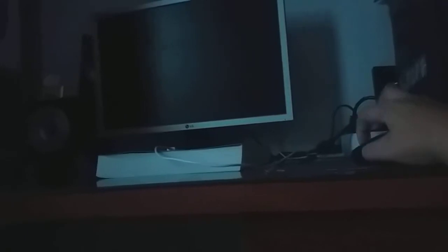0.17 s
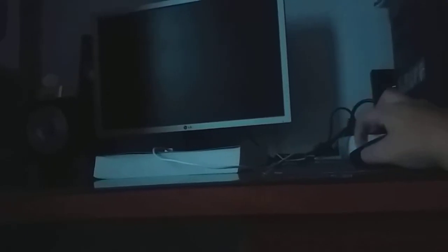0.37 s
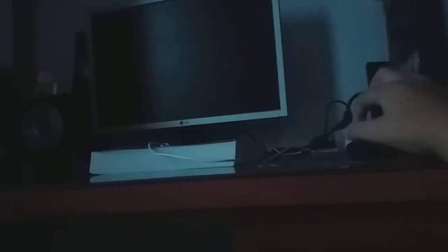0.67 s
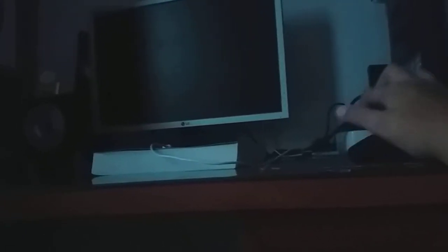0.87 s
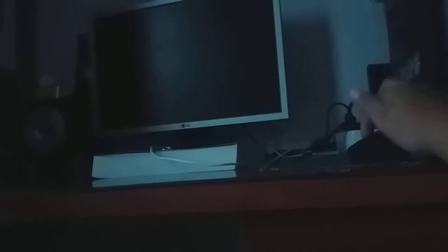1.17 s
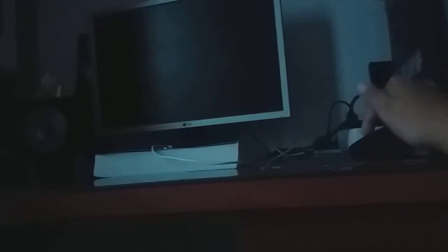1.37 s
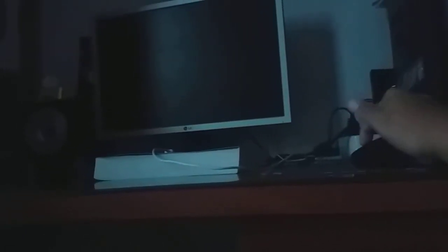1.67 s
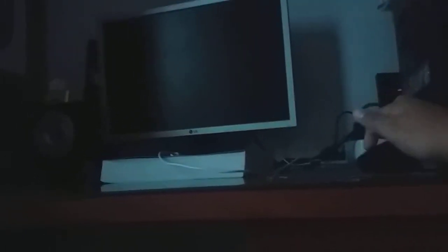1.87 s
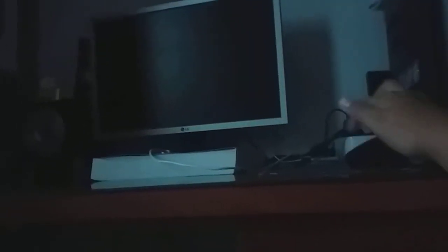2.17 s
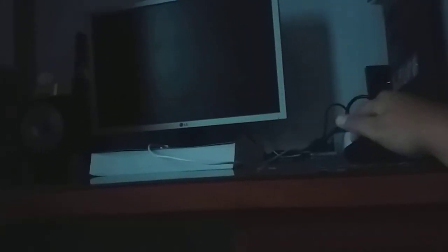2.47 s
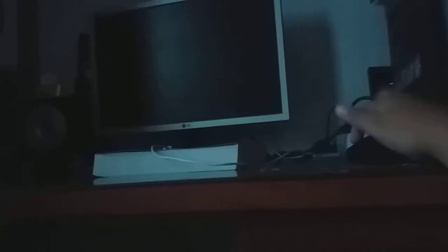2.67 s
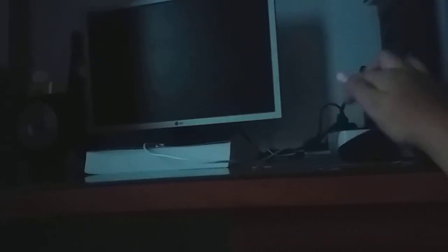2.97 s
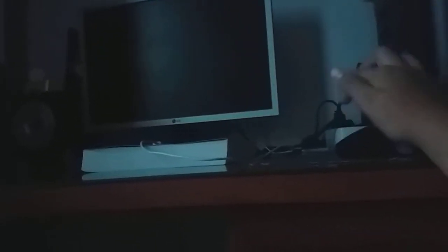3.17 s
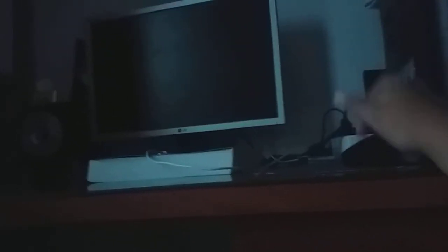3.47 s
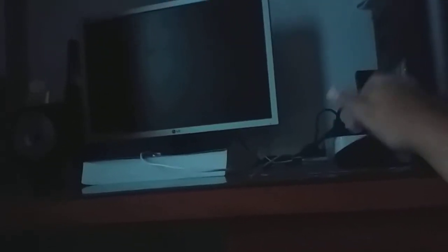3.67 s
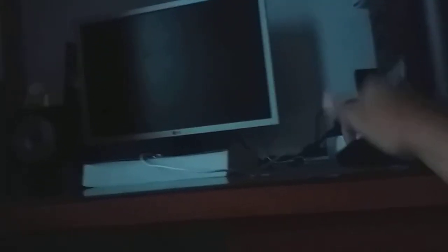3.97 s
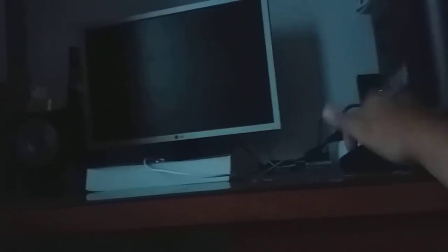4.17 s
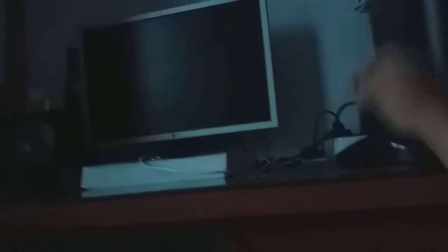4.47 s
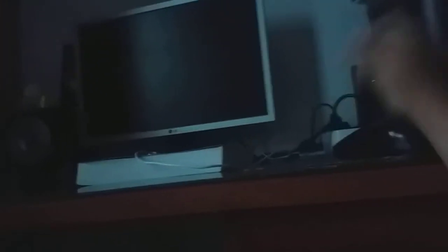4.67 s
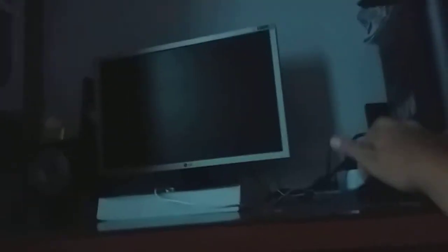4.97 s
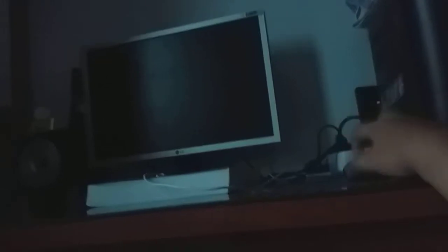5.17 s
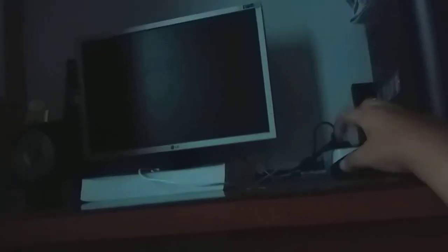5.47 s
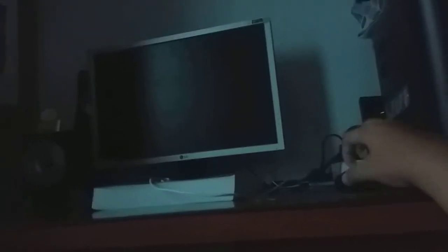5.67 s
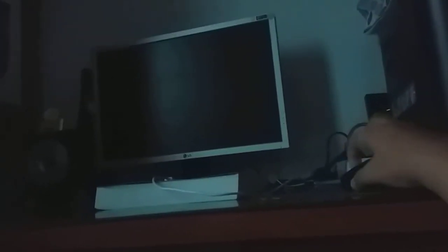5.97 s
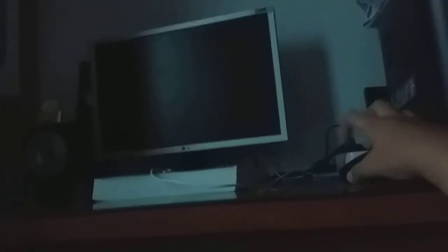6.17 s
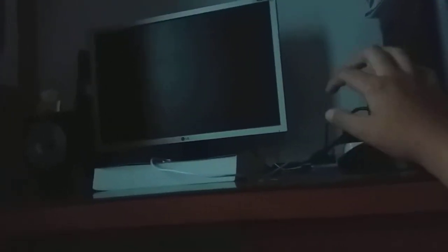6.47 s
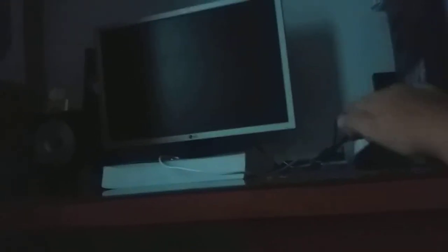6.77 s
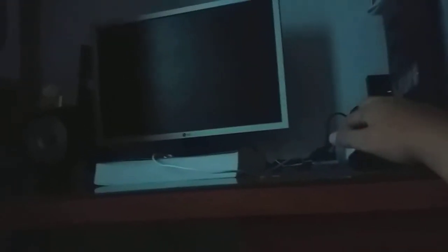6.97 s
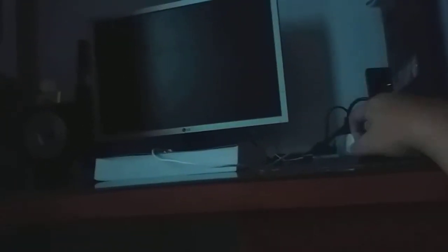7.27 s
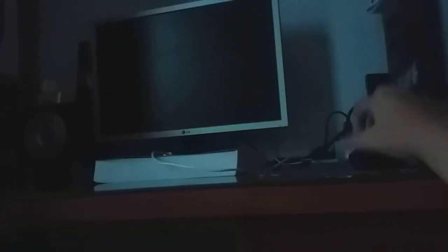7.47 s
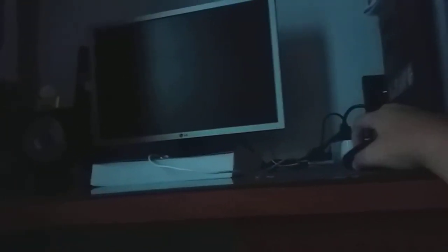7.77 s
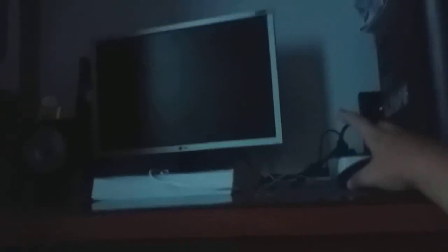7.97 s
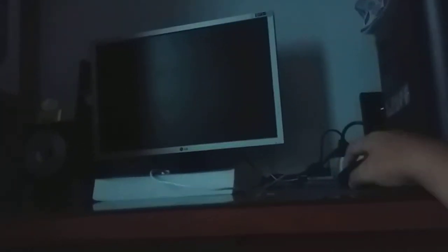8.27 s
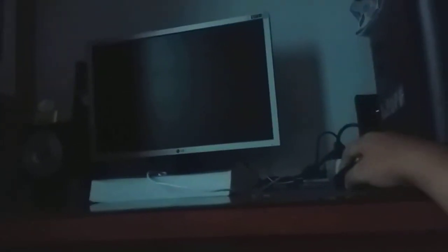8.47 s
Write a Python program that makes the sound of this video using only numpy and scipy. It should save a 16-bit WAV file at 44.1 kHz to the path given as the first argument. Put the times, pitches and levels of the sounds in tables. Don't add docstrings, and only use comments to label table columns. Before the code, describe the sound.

A very faint far whistle vanishes at once as a fingertip starts clicking a mouse button evenly, press and tiny release. Then fingers drop on the shell from above: brighter, louder, hollow plastic clacks, at first regular, later spaced unevenly with scrapy little nudges between. Muffled knocks travel through the desk. Quiet small room with faint hum swelling midway and steady hiss, picked up by a phone nearby.

```python
import sys
import numpy as np
from scipy import signal
from scipy.fft import rfft, irfft
from scipy.io import wavfile

SR = 44100
rng = np.random.default_rng(int(sys.argv[2]) if len(sys.argv) > 2 else 0)


def rack_gain(trim_db):
    fader = np.asarray(trim_db, float)
    return 10 ** (fader / 20)


def put_to_file(sound):
    columns = np.atleast_2d(sound).T
    safe = np.clip(columns, -1, 1)
    whole_steps = np.round(safe * 32767)
    wavfile.write(sys.argv[1], SR, whole_steps.astype(np.int16))


N = 380141
HIT = 16384
LEAD = 0.004

# start in seconds, shell peak in dB, switch spring in dB,
# desk in dB beside the shell, time held in seconds.
PRESSES = [(0.027, -37.5, -38, -23, .0522), (0.22, -14.5, -57, -28, 0.095),
           (0.4278, -34.5, -33.5, -21, 0.078), (0.604, -25.5, -30, -23.5, 0.071),
           (0.761, -36, -32, -27, .0701), (0.9523, -19.5, -27, -29, 0.095),
           (1.1543, -21.5, -26.5, -27, 0.076), (1.332, -26.5, -26, -19.5, 0.084),
           (1.5045, -39.5, -32, -48, 0.073), (1.68, -36, -28.5, -23.5, 0.089),
           (1.8838, -33, -25.5, -15.5, .0695), (2.0848, -21.5, -31, -24, 0.07),
           (2.2889, -24.5, -33, -28, 0.088), (2.4961, -21, -33, -23.5, .0802),
           (2.706, -28.5, -29, -15.5, 0.038), (5.4045, -36.5, -32.5, -24, 0.066)]
# start in seconds, shell peak in dB,
# then hollow belly and desk in dB beside the shell.
RAPS = [(2.8909, -14.5, -10, -30), (3.0772, -14.5, -10.5, -31), (3.268, -14, -10.5, -32.5),
        (3.4516, -12, -9, -33.5), (3.6305, -14, -6, -30.5), (3.8065, -19, -14, -31),
        (4.0228, -14.5, -8, -30), (4.208, -13, -7, -29.5), (4.4532, -5, -12, -28.5), (4.6338, -7, -9, -27),
        (4.846, -7.5, -11, -19), (5.6064, -12, -8.5, -18.5), (6.0244, -10.5, -8.5, -26),
        (6.2471, -12, -9.5, -25), (6.7336, -9.5, -9.5, -18.5), (7.2974, -5.5, -7.5, -22.5),
        (7.6764, -28, -15, -24), (8.175, -8.5, -7.5, -24), (8.4983, -12, -8, -24)]
# start in seconds, shell peak in dB,
# then belly, snap and desk in dB beside the shell.
NUDGES = [(5.219, -29, -7, -10, -23.5), (5.8164, -20, -10, -3.5, -22.5), (6.4099, -26, -4.5, -20, -8),
          (6.4219, -50.5, 7, -3, -5), (6.988, -38.5, -44, -5, -37.5), (7.01, -23.5, -27.5, -16.5, -38),
          (7.5308, -25, -7.5, -12.5, -16.5), (7.7036, -30, -14.5, -4.5, -23.5), (5.205, -49, -30, -22, -30),
          (7.8565, -51, -14.5, -22.5, -26), (8.007, -49, -11, -22, -12.5)]


def contacts():
    s, db, spring_db, desk_db, _ = np.transpose(PRESSES)
    snap_db = -12.5 - 0.24 * db
    press = s, db, -13, snap_db, spring_db - db, desk_db
    s, db, belly_db, desk_db = np.transpose(RAPS)
    rap = s, db, belly_db, -7, -28.5 - db, desk_db
    s, db, belly_db, snap_db, desk_db = np.transpose(NUDGES)
    nudge = s, db, belly_db, snap_db, -37, desk_db
    return in_time(press, rap, nudge)


# pitch in Hz, level in dB, t60 in seconds.
SHELL = [(2034, -1.5, 0.03), (2350, 10.5, 0.0038), (2620, 7, 0.0029), (3275, -3.5, 0.0048),
         (3600, 2.5, 0.0061)]
BELLY = [(660, 10, 0.0092), (720, -36, 0.013), (795, 9, 0.038), (939, -15, 0.0087), (990, 12, 0.0076)]
FLANK = [(1345, -6.5, 0.043), (1592, 8, 0.014), (1700, -0.5, 0.0087)]
SPRING = [(7820, -1, 0.018), (8130, -8.5, 0.03), (8300, -10, 0.031)]
DESK = [(95.5, -4, 0.03), (121, -6, 0.095), (150, -5.5, 0.084), (185, -5.5, 0.15), (230.6, -7.5, 0.045),
        (308, 1.5, 0.051), (420, -0.5, 0.036), (497, -7.5, 0.11), (563, -11, 0.019)]
# frequency in Hz, level in dB.
SNAP = [(3500, -25.5), (4400, -7), (5000, -2), (5600, 0), (7000, 1), (8000, -3), (8600, -5), (10400, -4.5),
        (12500, -5), (16000, -6.5)]


def hand_on_mouse():
    s, db, belly_db, snap_db, spring_db, desk_db = contacts()
    count = len(s)
    mouse = body(SHELL, count)
    mouse = mouse + rack_gain(2 * (belly_db + 9)) * body(BELLY, count)
    mouse = mouse + rack_gain(2 * (0.8 * belly_db + 3)) * body(FLANK, count)
    mouse = mouse + rack_gain(2 * (snap_db + 9.5 + shape(SNAP, HIT)))
    mouse = mouse + rack_gain(2 * (spring_db - 1)) * body(SPRING, count, detune=0.0024)
    tap = -strike(mouse, chatter(count, 0.0031, 330, 2500, uneven_db=2.5))
    push = chatter(count, 0.0193, 45, 48.2) * soft(52, 2100)
    thump = strike(body(DESK, count), push)
    return place(s[:, 0] - 0.0003, rack_gain(db + 14) * (tap + rack_gain(desk_db + 18) * thump))


# start in seconds, shell peak in dB,
# then belly and upper spring in dB beside the shell.
SETTLES = [
    (5.0093, -33.5, -28, -31),
    (5.034, -34.5, -6, -32),
    (5.7183, -36, -18, -23),
    (5.91, -39.5, -33, -12),
    (6.6705, -53.5, -16, -1.5),
    (7.189, -57, -18, -16),
    (7.4654, -37.5, -20, -11),
    (8.3285, -38, -13, -16.5),
    (8.359, -45, -10, -19),
]
# pitch in Hz, level in dB, t60 in seconds.
LET_GO = [(1550, -11.5, 0.004), (2250, 3.5, 0.0031), (3730, -2, 0.0085), (4720, -17.5, 0.0034),
          (6590, -3.5, 0.0016), (8700, 3, 0.0014), (14500, 0, 0.0023)]
TOP_SPRING = [(12400, 9, 0.0024), (12760, -3, 0.0124), (13000, -11, 0.0046)]


def releases():
    start_s, *_, held_s = np.transpose(PRESSES)
    let_go = start_s + held_s, -37, -14, -13
    s, db, belly_db, spring_db = in_time(let_go, np.transpose(SETTLES))
    count = len(s)
    button = body(LET_GO, count, detune=0.017)
    button = button + rack_gain(2 * (belly_db + 7.5)) * body(BELLY, count)
    button = button + rack_gain(2 * (spring_db + 5.5)) * body(TOP_SPRING, count, detune=0.004)
    tick = strike(button, chatter(count, 0.0019, 330, 1500, uneven_db=3.5))
    return place(s[:, 0] - 0.0003, rack_gain(db + 16) * tick)


# start in seconds, peak in dB, upper wood in dB beside it.
KNOCKS = [
    (0.526, -12.5, -6.5),
    (0.731, -49, -8),
    (2.316, -19, -4),
    (2.559, -28, -13),
    (3.878, -28, -24),
    (4.109, -43.5, -3.5),
    (5.475, -39.5, -10),
    (6.676, -50, -11),
    (8.585, -32, -9.5),
]
# pitch in Hz, level in dB, t60 in seconds.
WOOD_LOW = [(143.6, -11, 0.071), (188.5, -0.5, 0.13), (213, -12, 0.11), (245, -3.5, 0.18),
            (331, 3.5, 0.046)]
WOOD_HIGH = [(418, -4, .1), (540, 5, 0.044), (773, -7, .12)]


def knocks():
    s, db, high_db = np.transpose(KNOCKS)[:, :, None]
    count = len(s)
    panel = body(WOOD_LOW, count) + rack_gain(2 * (high_db - 0.2)) * body(WOOD_HIGH, count)
    push = chatter(count, 0.022, 50, 150) * soft(110, 650)
    return place(s[:, 0], rack_gain(db + 33) * strike(panel, push))


# delay in seconds, level in dB.
ECHOES = [(.00135, -11.5), (.0042, -14.5), (.0083, -11.5), (0.0108, -15)]
# band centre in Hz, level in dB, t60 in seconds.
ROOM = [(101, -14.5, 0.58), (274, -23, 0.65), (760, -9, 0.3), (1740, -14.5, 0.35), (4500, -12.5, .27),
        (8440, -12.5, 0.35), (12100, -11.5, 0.31)]
# pitch in Hz, level in dB.
STANDING = [(118, -10.5), (186, -5.5), (241, 2.5), (319, 3), (485, -11), (712, 3.5), (786, -4), (876, 4.5),
            (922, -10), (1025, 3.5), (1303, 3), (1537, 6.5), (2050, 0.5)]


def room(x):
    t = np.arange(int(0.7 * SR)) / SR
    octave = np.log2(np.fft.rfftfreq(len(t), 1 / SR) + 1)
    centres = np.log2(np.transpose(ROOM)[0])
    noise = rfft(rng.standard_normal(len(t)))
    tail = 0
    for k, (hz, db, t60) in enumerate(ROOM):
        share = np.interp(octave, centres, np.arange(len(ROOM)) == k)
        tail = tail + rack_gain(db - 18 - 60 * t / t60) * irfft(noise * share, len(t))
    for (hz, db), turn in zip(STANDING, rng.random(len(STANDING))):
        tail = tail + rack_gain(db - 53 - 60 * t / 0.22) * np.sin(2 * np.pi * (hz * t + turn))
    tail = tail * np.clip(t / 0.0019, 0, 1)
    tail[0] = 1
    for s, db in ECHOES:
        tail[int(s * SR)] += rack_gain(db)
    return signal.fftconvolve(x, tail)[:N]


# frequency in Hz, level in dB per Hz.
AIR = [(24, -57.5), (40, -9.5), (64, -0.5), (112, 5.5), (189, 2), (320, -8.5), (479, -10.5), (556, -10),
       (630, -11.5), (1340, -16.5), (1480, -18.5), (1850, -17.5), (4240, -29.5), (16000, -25.5)]
# time in seconds, level in dB.
RUMBLE = [(0, -64), (.6, -60), (2.6, -58), (4.1, -54), (4.85, -54.5), (5.1, -60), (6.1, -62), (6.6, -68),
          (7.3, -71), (7.55, -63.5), (8.62, -68)]
# time in seconds, level in dB.
WHISTLE = [(0, -61), (.03, -68), (.065, -58), (.1, -57), (.135, -66), (.16, -63), (.19, -58), (.215, -66)]


def air():
    t = np.arange(N) / SR
    hush = rfft(rng.standard_normal(N)) * rack_gain(shape(AIR, N))
    low = 1 / (1 + (np.fft.rfftfreq(N, 1 / SR) / 350) ** 4)
    hum_db = np.interp(t, *np.transpose(RUMBLE)) + 0.1
    hiss_db = -62
    out = 0
    for share, db in ((low, hum_db), (1 - low, hiss_db)):
        band = irfft(hush * share, N)
        out = out + band / band.std() * rack_gain(db)
    s, db = np.transpose(WHISTLE)
    whistle = rack_gain(np.interp(t, s, db, right=-120)) * np.sin(2 * np.pi * 2022 * t)
    return out + whistle


def chatter(count, length_s, step_hz, loose_hz, uneven_db=3.5):
    hz = np.fft.rfftfreq(HIT, 1 / SR)
    knots = np.arange(60) * step_hz
    luck = rng.random((count, 2, len(knots)))
    loose = np.clip(knots / loose_hz, 0, 1)
    knot_lag = luck[:, 0] ** 2 * length_s * loose ** 2
    knot_db = (luck[:, 1] - 0.5) * np.sqrt(12) * uneven_db * loose
    lag = np.array([np.interp(hz, knots, row) for row in knot_lag])
    db = np.array([np.interp(hz, knots, row) for row in knot_db])
    return rack_gain(db) * np.exp(-2j * np.pi * np.cumsum(lag + LEAD, axis=1) * hz[1])


def soft(low_hz, high_hz):
    s = 1j * np.fft.rfftfreq(HIT, 1 / SR)
    return (s / (s + low_hz)) ** 3 * (high_hz / (s + high_hz)) ** 3


def body(modes, count, spread_db=3.0, detune=0.012):
    hz, db, t60 = np.transpose(modes)[:, :, None]
    luck = rng.standard_normal((count, 2, len(hz), 1))
    f = np.fft.rfftfreq(HIT, 1 / SR)
    centre = hz * (1 + detune * luck[:, 0])
    width = np.log(1000) / (np.pi * t60)
    off = (f ** 2 - centre ** 2) / (f + 1)
    power = np.sum(rack_gain(2 * (db + spread_db * luck[:, 1])) / (off ** 2 + width ** 2), axis=1)
    return power / power.mean(axis=1, keepdims=True)


def strike(power, blows):
    cepstrum = irfft(np.log(power + 1e-9) / 2, HIT)
    cepstrum[:, 1:HIT // 2] *= 2
    cepstrum[:, HIT // 2 + 1:] = 0
    return irfft(np.exp(rfft(cepstrum)) * blows, HIT)


def place(times, hits):
    t = np.arange(HIT) / SR
    fade_in = np.clip((t - LEAD) / 0.0004 + 1, 0, 1)
    fade_out = np.clip((t[-1] - t) / 0.08 - 0.5, 0, 1)
    out = np.zeros(N + HIT)
    for s, hit in zip(times - LEAD, hits):
        start = int(s * SR)
        out[start:start + HIT] += hit * fade_in * fade_out
    return out[:N]


def in_time(*tables):
    rows = np.hstack([np.broadcast_arrays(*table) for table in tables])
    return rows[:, np.argsort(rows[0]), None]


def shape(points, count):
    hz, db = np.transpose(points)[:2]
    return np.interp(np.log(np.fft.rfftfreq(count, 1 / SR) + 1), np.log(hz), db)


def scene():
    wood = knocks()
    heard = room(hand_on_mouse() + releases() + 0.14 * wood)
    return np.tile(heard + 0.19 * wood + air(), (2, 1))


def low_pass(x):
    return signal.sosfilt(signal.butter(12, 17090, fs=SR, output="sos"), x)


# frequency in Hz, left minus right in dB.
PORTS = [(1500, -.3), (2400, -1.1), (3400, -4), (4500, -7.6), (5400, -10), (6500, -7.8), (8500, 0),
         (9800, 2.8), (11700, 2.8), (13500, .3), (15000, 0)]
# frequency in Hz, level in dB.
MIC = [(20, -18.5), (50, -6.5), (80, -2.5), (15500, -2), (15900, -24.5), (16900, -33), (17200, -90.5)]


def record(dry):
    lean = np.tanh(shape(PORTS, N) * np.log(10) / 40)
    rounded = 2 * np.tanh(dry / 2)
    spectrum = rfft(rounded) * rack_gain(shape(MIC, N))
    mix = irfft(spectrum * np.array([1 + lean, 1 - lean]), N)
    return low_pass(mix)


dry = scene()
out = record(dry)
put_to_file(out)
```